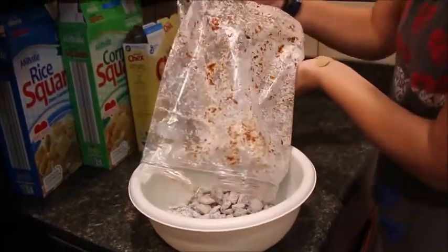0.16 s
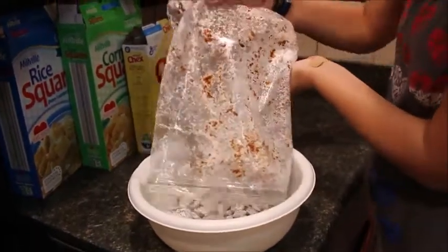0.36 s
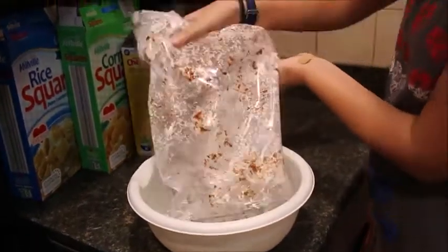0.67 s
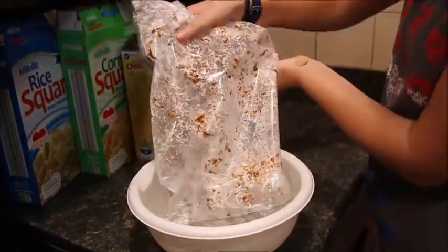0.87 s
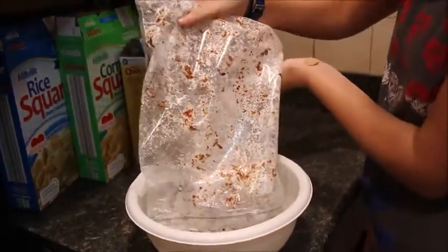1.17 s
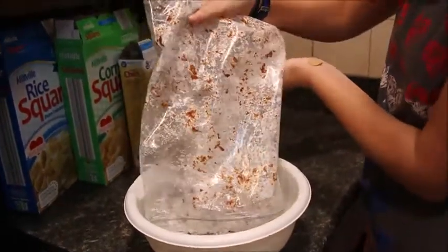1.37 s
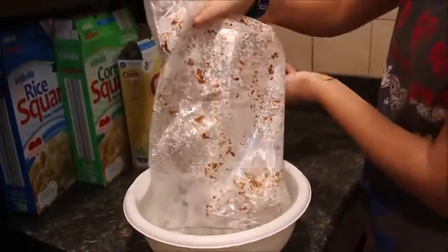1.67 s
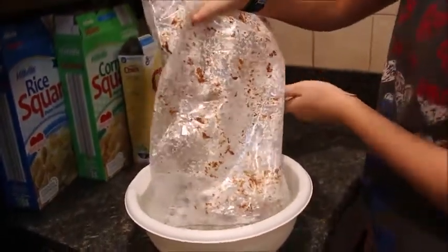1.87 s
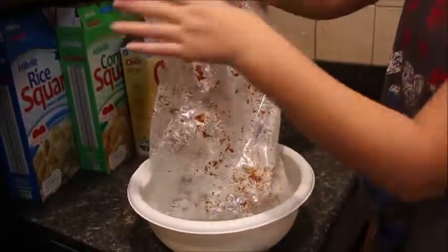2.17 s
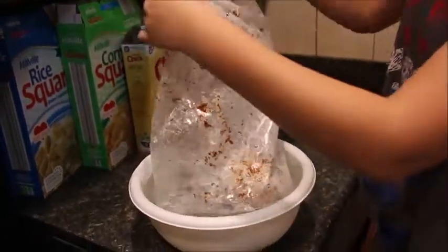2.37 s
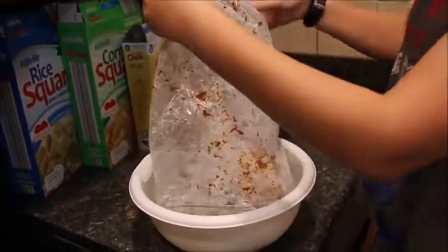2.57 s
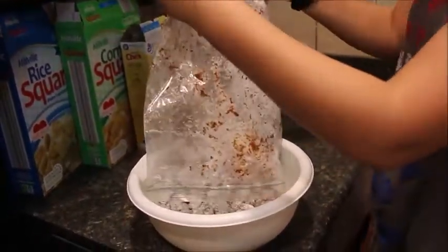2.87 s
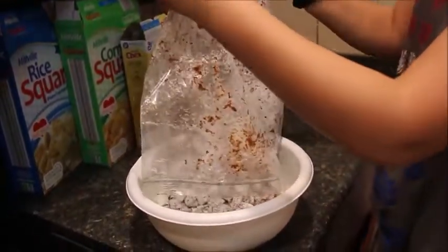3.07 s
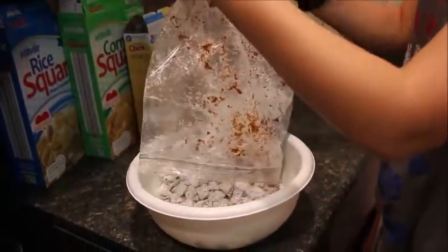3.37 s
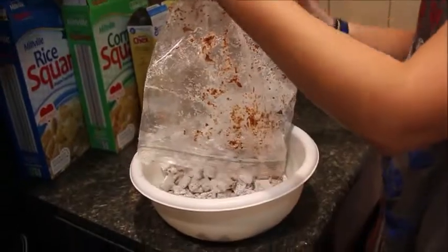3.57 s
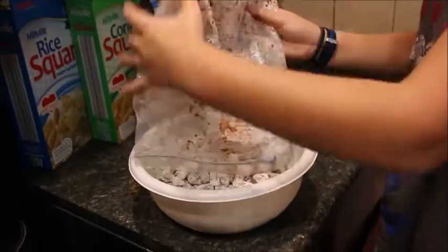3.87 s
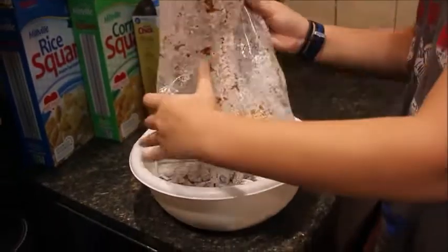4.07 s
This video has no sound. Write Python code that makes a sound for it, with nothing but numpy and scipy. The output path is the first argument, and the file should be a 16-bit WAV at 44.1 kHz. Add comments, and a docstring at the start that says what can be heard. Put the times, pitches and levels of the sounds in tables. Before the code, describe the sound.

Close stereo pickup in a small hard kitchen: a plastic bag rustles and snaps as coated cereal slides out and clumps land in a plastic bowl with short, dry mid-pitched knocks. The first knocks are the firmest, then shakes bring swells of pattering and crinkling, strongest around 0.7, 1.5 and 2.7 seconds. A thin trickle fills the gaps over a soft steady low hum.

```python
"""Film rustles and cereal slides over a low steady hum, while clumps land throughout with short knocks.
Coated cereal is shaken out of a large plastic bag into a plastic bowl on a kitchen counter.
Knocks are band-passed impulses with a noise crunch; creases and scuffs are dying noise bursts.
Sliding and rustling are coloured random clicks, swelling with each shake over a thin trickle.
A small hard kitchen, built of decaying stereo noise, answers every sound but the hum."""
import sys
import numpy as np
from scipy import signal
from scipy.fft import rfft, irfft
from scipy.io import wavfile

SR = 44100
rng = np.random.default_rng(int(sys.argv[2]) if len(sys.argv) > 2 else 0)


def to_wav(s):
    """Save 16-bit WAV."""
    ch = np.atleast_2d(s).T  # columns
    pcm = np.round(np.clip(ch, -1, 1) * 32767)  # PCM
    wavfile.write(sys.argv[1], SR, pcm.astype(np.int16))


N = 186661
TIME_S = np.arange(N) / SR

# Clumps landing in the bowl. Each row: start in seconds, ring level in dB, ring centre in Hz,
# crust level in dB and bowl level in dB (both against the ring, before a common trim), ring width in octaves.
KNOCKS = [(0.293, -4, 1880, -20, -15.5, 0.56), (0.35, -2, 1900, -17, -17, 0.76),
          (0.397, -3, 1670, -18.5, -10.5, 0.54), (0.6985, -16, 1920, -16, -7, 0.49),
          (0.8508, -16.5, 2010, -33, -12, 0.53), (0.8583, -13.5, 1660, -29.5, -9, 0.53),
          (1.092, -14, 2060, -13, -20, 0.71), (1.1114, -6.5, 1790, -31, -15.5, 0.37),
          (1.1903, -4.5, 1840, -18, -19, .5), (1.1965, -5.5, 2030, -19.5, -19, 0.46),
          (1.2017, -13, 1980, -23, -13, 1.6), (1.2625, -13.5, 2060, -23, -8.5, 0.97),
          (1.6444, -10.5, 1830, -19, -16.5, 0.39), (1.658, -12, 2100, -23, -8, 0.54),
          (1.7755, -11, 2110, -11.5, -15.5, 0.37), (1.832, -9, 1890, -28, -11.5, 0.55),
          (2.0806, -21.5, 1690, -21, -1.5, 0.59), (2.129, -20.5, 2260, -1, -6, 0.53),
          (2.219, -16.5, 1820, -34, -15, 0.63), (2.266, -18, 1840, -11, -8, 0.73),
          (2.638, -15.5, 1590, -9, -28, 0.69), (2.7661, -10.5, 1730, -11, -20, 0.58),
          (3.015, -13, 1720, -38, -3.5, 0.64), (3.108, -19.5, 1850, -17, -11.5, 0.67),
          (3.2145, -21, 1880, -4, 4, 4.2), (3.276, -9, 1960, -39, -12, 0.64),
          (3.364, -16, 2100, -27, -25, 0.86), (3.3727, -8.5, 2110, -8.5, -14.5, 0.94),
          (3.3781, -7, 2270, -12, -13.5, 0.86), (3.5406, -8.5, 1850, -15.5, -12, .75),
          (3.6702, -16.5, 1870, -17, -12, 0.42), (4.114, -14, 1620, -19, -6, 0.63)]
# Creases of the bag snapping through. Each row: start in seconds, level in dB before a common trim,
# brightness in dB before a common treble lift.
CREASES = [(0.0535, -13, -15), (0.1333, -11.5, -17.5), (0.18, -24.5, 7.5), (0.198, -11.5, -13),
           (0.524, -19.5, -9), (0.649, -10, -9.5), (0.7003, -10, -13), (0.7642, -13.5, -4.5),
           (1.261, -14.5, -6.5), (1.3015, -22, -5), (1.365, -12, -6.5), (1.4305, -13, -11), (1.478, -20, 7),
           (1.609, -17.5, -9), (1.7056, -20.5, -6), (2.0424, -14, -8), (2.2819, -18.5, 1.5),
           (2.3021, -12.5, -4), (2.33, -13, -22), (2.488, -14, -12), (2.5566, -14, -4.5), (2.5897, -21, 1),
           (2.8874, -11.5, -8.5), (3.447, -12, -17), (3.7293, -11.5, -12.5), (3.775, -10.5, -26),
           (3.9552, -15.5, 3.5), (4.0372, -13.5, -3.5)]
# Slack bag and bowl bumped by the hands. Each row: start in seconds, level in dB before trims, sway in Hz.
THUMPS = [(0.554, -28, 203), (1.253, -24, 218), (1.643, -27.5, 167), (1.864, -33.5, 76.8), (2.028, -39, 88),
          (2.637, -24.5, 209), (2.719, -18, 162), (3.947, -32, 220), (4.108, -35, 220)]
# Shakes and squeezes of the bag. Each row: peak time in seconds, rise in seconds, fall in seconds,
# sliding cereal in dB, crinkling film in dB (both before layer trims).
SHAKES = [(0.0, .03, 0.05, -36.5, -46), (0.205, 0.0054, 0.07, -57, -42), (0.663, 0.056, 0.076, -28.5, -41),
          (1.05, 0.057, 0.028, -41, -47.5), (1.41, 0.12, 0.047, -42.5, -43),
          (1.491, 0.012, 0.028, -30.5, -35.5), (1.64, 0.044, 0.31, -41, -55),
          (2.335, 0.053, 0.052, -31.5, -39), (2.41, 0.046, 0.014, -34, -44),
          (2.58, 0.082, 0.064, -33.5, -40.5), (2.65, .03, 0.058, -32.5, -47),
          (2.729, 0.019, 0.046, -27, -38), (2.849, 0.044, 0.027, -35.5, -41.5), (3.0, .05, 0.19, -56, -52),
          (3.77, 0.058, .11, -31.5, -39.5), (4.001, .07, 0.056, -36.5, -42.5),
          (4.17, 0.053, 0.27, -37.5, -47.5)]
# Thin trickle of pieces between the shakes. Each row: time in seconds, level in dB before layer trims.
TRICKLE = [(0.0, -45), (0.3, -42), (0.9, -43.5), (1.85, -41), (2.2, -48), (2.47, -53), (3.02, -38.5),
           (3.3, -55), (3.65, -44), (4.23, -43)]

# Colour of the crunching crust. Each row: frequency in Hz, gain in dB.
CRUST_COLOUR = [(500, -27), (1500, 12.5), (3200, 7.5), (4500, 5.5), (6000, -1), (10000, -25.5),
                (16000, -36)]
# Colour of snapping film. Each row: frequency in Hz, gain in dB.
FILM_COLOUR = [(150, 1.5), (600, -18.5), (1500, 1.5), (3500, -4), (6000, -5), (10000, -11), (16000, -27)]
# Colour of sliding cereal. Each row: frequency in Hz, gain in dB.
SLIDE_COLOUR = [(150, -24), (330, -1), (620, -0.5), (900, -1.5), (1500, -0.5), (2600, -4), (4000, -11),
                (7000, -26.5), (16000, -49)]
# Colour of scraping film. Each row: frequency in Hz, gain in dB.
SCRAPE_COLOUR = [(500, -24), (2000, -8.5), (4000, 6.5), (6000, -0.5), (9000, -7.5), (12000, -16),
                 (16000, -35)]
# Colour of the bag flexing as a whole. Each row: frequency in Hz, gain in dB.
FLEX_COLOUR = [(30, -32), (70, -25), (120, -3), (165, 0), (212, 1), (290, -7.5), (500, -28), (2000, -52)]
# Colour of the struck bowl. Each row: frequency in Hz, gain in dB.
BOWL_COLOUR = [(80, -9), (200, -18), (450, -3.5), (650, 4.5), (1100, 1.5), (1800, -11), (5000, -41)]
# Colour of the hum. Each row: frequency in Hz, gain in dB.
HUM_COLOUR = [(20, -15), (38, -30), (70, -7), (125, 2), (210, 1.5), (310, -7), (650, -5.5), (1500, -15.5),
              (4000, -22.5), (8000, -34), (15000, -40)]
# Side against mid in diffuse sound. Each row: frequency in Hz, gain in dB.
WIDTH = [(50, -12.5), (200, -11), (500, -13), (1000, -11.5), (2000, -6.5), (4000, -5), (8000, -0.5),
         (13000, 3.5)]
# Colour of the bag scuffing the bowl. Each row: frequency in Hz, gain in dB.
SCUFF_COLOUR = [(50, -28), (130, 8.5), (260, 15), (600, -3), (2000, -31)]
# Colour of the reflections. Each row: frequency in Hz, gain in dB.
WALL_COLOUR = [(200, 1.1), (600, 7.2), (2000, 3.9), (6000, 5.5), (14000, 1.2)]


def undb(db):
    """Decibels to gain."""
    return 10 ** (np.asarray(db) / 20)


def level(x, rms_db):
    """Set the rms level."""
    return x * undb(rms_db) / np.sqrt(np.mean(x ** 2))


def colour(x, points, size=2048):
    """Minimum-phase filter through (Hz, dB) points, by folding the cepstrum."""
    hz, db = np.transpose(points)
    bins_hz = np.fft.rfftfreq(size, 1 / SR)
    gain = undb(np.interp(np.log(bins_hz + 1), np.log(hz), db))
    cepstrum = irfft(np.log(gain))
    cepstrum[1:size // 2] *= 2
    cepstrum[size // 2 + 1:] = 0
    response = irfft(np.exp(rfft(cepstrum)))
    return signal.fftconvolve(x, response)[:len(x)]


def fade(t_s, t60_s):
    """Exponential decay, 60 dB in t60_s."""
    return np.exp(-np.log(1000) * t_s / t60_s)


def add(track, start_s, sound):
    """Mix a sound in at a time."""
    start = int(np.clip(start_s * SR, 0, N - 1))
    track[start:start + len(sound)] += sound[:N - start]


def clicks(rate_hz, scatter_db):
    """Random impulses of either sign, uneven in size."""
    chance, size, sign = rng.random(N), rng.standard_normal(N), rng.choice([-1, 1], N)
    return (chance < rate_hz / SR) * sign * undb(scatter_db * np.clip(size, -2, 2))


def crunch(t_s, t60_s):
    """Dying burst of tiny fractures, of unit energy."""
    burst = rng.standard_normal(len(t_s)) * fade(t_s, t60_s)
    return burst / np.sqrt(np.sum(burst ** 2))


def stereo_noise(size):
    """Diffuse noise, nearly alike in the bass and spreading wide in the treble."""
    mid = rng.standard_normal(size)
    side = colour(rng.standard_normal(size), WIDTH)
    return np.array([mid + side, mid - side])


def kitchen(x, near_db, tiles_db, far_db=0.5, near_t60_s=0.043, far_t60_s=0.3):
    """Bowl, counter and tiles reflect within milliseconds; the room rings on behind them."""
    t_s = TIME_S[:SR // 3]
    near_onset = np.clip(t_s / 0.0011 - .4, 0, 1)
    far_onset = np.clip(t_s / 0.0049 - .5, 0, 1)
    near = undb(near_db) * fade(t_s, near_t60_s) * near_onset / np.sqrt(near_t60_s)
    far = undb(far_db) * fade(t_s, far_t60_s) * far_onset / np.sqrt(far_t60_s)
    response = stereo_noise(len(t_s)) * np.hypot(near, far) * np.sqrt(np.log(1000) / SR)
    response[:, int(.0055 * SR)] += undb(tiles_db)  # one distinct reflection, 5.5 ms late
    echoes = [signal.fftconvolve(x, colour(side, WALL_COLOUR))[:len(x)] for side in response]
    return x + np.array(echoes)


def steady_hum(hum_db=-46.5):
    """Low steady hum: diffuse noise, strongest around 100 to 200 Hz."""
    hum = np.array([colour(side, HUM_COLOUR) for side in stereo_noise(N)])
    return level(hum, hum_db)


def thumps(rise_s=0.0029, cycles=9, thump_db=3.5, scuff_t60_s=0.072, scuff_db=20.5):
    """Soft pushes move the whole bag for a few slow cycles and scuff it against the bowl."""
    track, t_s = np.zeros(N), TIME_S[:SR // 4]
    for start_s, db, hz in THUMPS:
        swell = (1 - np.exp(-t_s / rise_s)) * fade(t_s, cycles / hz)
        sway = swell * np.sin(2 * np.pi * hz * t_s)
        scuff = colour(crunch(t_s, scuff_t60_s), SCUFF_COLOUR)
        add(track, start_s, undb(db) * (undb(thump_db) * sway + undb(scuff_db) * scuff))
    return track


def shaking(trickle_film_db=-13):
    """Levels in dB of sliding cereal and film: shakes swell and die exponentially over the trickle."""
    slide = undb(np.interp(TIME_S, *np.transpose(TRICKLE)))
    film = slide * undb(trickle_film_db)  # film stirred by the trickle
    for peak_s, rise_s, fall_s, slide_db, film_db in SHAKES:
        swell = np.exp(-np.abs(TIME_S - peak_s) / np.where(TIME_S < peak_s, rise_s, fall_s))
        slide = np.hypot(slide, undb(slide_db) * swell)
        film = np.hypot(film, undb(film_db) * swell)
    return 20 * np.log10([slide, film])


def rustle(cluster_t60_s=0.027, flex_follows=0.5):
    """Pieces slide and patter down the film, which scrapes, crinkles in clusters and flexes as a whole."""
    slide_db, film_db = shaking()
    slide = level(colour(clicks(rate_hz=2800, scatter_db=5.5), SLIDE_COLOUR), 0.017)
    patter = level(colour(clicks(rate_hz=140, scatter_db=6), SLIDE_COLOUR), -2.5)
    scrape = level(colour(clicks(rate_hz=2500, scatter_db=1), SCRAPE_COLOUR), -0.7)

    cluster_starts = np.abs(clicks(rate_hz=42, scatter_db=3.5))
    clusters = signal.fftconvolve(cluster_starts, fade(TIME_S[:SR // 10], cluster_t60_s))[:N]
    crinkle = level(colour(clusters * clicks(rate_hz=4000, scatter_db=5.5), FILM_COLOUR), -1.5)

    flex = level(colour(clicks(rate_hz=1200, scatter_db=-0.5), FLEX_COLOUR), -26.0)
    return [
        slide * undb(slide_db),
        patter * undb(slide_db),
        (scrape + crinkle) * undb(film_db),
        flex * undb(flex_follows * slide_db),  # half the slide's swing in dB
    ]


def creases(snap_db=10.5, run_t60_s=0.028, facet_hz=3860, facet_scatter_octaves=0.19,
            ring_share=0.13, ring_t60_s=0.0023):
    """A crease gives one sharp snap and a run of smaller ones; a facet of film rings with them."""
    heard, t_s = np.zeros((2, N)), TIME_S[:SR // 3]
    for start_s, db, bright_db in CREASES:
        run = crunch(t_s, run_t60_s)
        run[0] += .8  # the first sharp snap
        hz = facet_hz * 2 ** (facet_scatter_octaves * rng.standard_normal())
        facet = ring_share * fade(t_s, ring_t60_s) * np.cos(2 * np.pi * hz * t_s)
        ringing = signal.fftconvolve(run, facet)[:len(t_s)]
        snap = colour(run + ringing, FILM_COLOUR)
        snap = undb(db + snap_db) * colour(snap, [(4000, 0), (10000, bright_db + 4)])
        # each crease lies elsewhere on the bag: own echoes
        echoed = kitchen(snap, near_db=-0.5, tiles_db=-9.0, far_db=0.0)
        for track, side in zip(heard, echoed):
            add(track, start_s, side)
    return heard


def knocks(rebound_s=0.001199, rebound_db=-6, crush_t60_s=0.022, crush_rise_s=0.0022,
           ring_db=0, crust_db=4, bowl_db=1):
    """Each clump lands, tips over and rings for a few cycles; its crust crunches and the bowl takes the blow."""
    heard, t_s = np.zeros((2, N)), TIME_S[:SR // 3]
    blow = signal.unit_impulse(len(t_s))
    bowl = colour(blow, BOWL_COLOUR)
    for start_s, db, hz, tick_db, body_db, octaves in KNOCKS:
        # two coupled resonances: a flat-topped band that swells over the first cycle
        edges_hz = hz * 2 ** (octaves * np.array([-.5, .5]))
        band = signal.butter(2, edges_hz, "band", fs=SR, output="sos")
        ring = signal.sosfilt(band, blow + 1e-18)  # tiny offset avoids denormals
        ring *= undb(ring_db) / np.abs(ring).max()
        rebound = undb(rebound_db) * ring[:len(t_s) // 2]
        add(ring, rebound_s * rng.uniform(.7, 1.585), rebound)

        crush = crunch(t_s, crush_t60_s) * (1 - np.exp(-t_s / crush_rise_s))
        crust = level(colour(crush, CRUST_COLOUR), crust_db + tick_db)
        contact = ring.std() * (crust + level(bowl, bowl_db + body_db))
        # each clump lands elsewhere in the bowl: own echoes
        echoed = kitchen(undb(db) * (ring + contact), near_db=-3, tiles_db=-14)
        for track, side in zip(heard, echoed):
            add(track, start_s, side)
    return heard


def scene():
    """Each source has its own place in the kitchen, and so its own echoes; a steady hum lies underneath."""
    layers = [*rustle(), thumps()]
    handling = sum(kitchen(layer, near_db=-3.5, tiles_db=-22.5, far_db=-4.5) for layer in layers)
    return steady_hum() + handling + creases() + knocks()


def record(dry, left_db=0.2, bass_hz=52, top_hz=15650):
    """Lean slightly left, cut the deepest bass and the top."""
    lean = undb([[left_db], [-left_db]])
    high_pass = signal.butter(4, bass_hz, "high", fs=SR, output="sos")
    low_pass = signal.ellip(10, .2, 70, top_hz, fs=SR, output="sos")  # 0.2 dB ripple, 70 dB stop
    thin = signal.sosfilt(high_pass, dry * lean)
    return signal.sosfilt(low_pass, thin)


dry = scene()
out = record(dry)
to_wav(out)
```